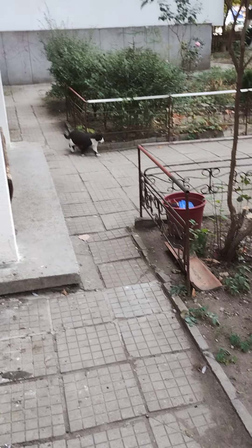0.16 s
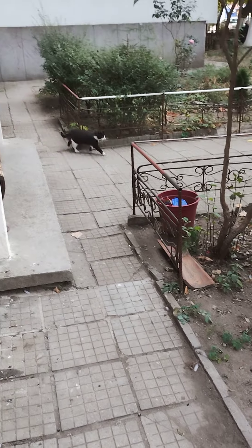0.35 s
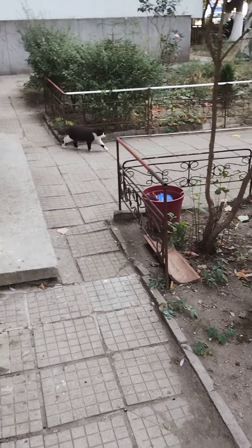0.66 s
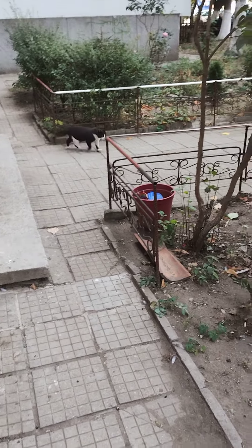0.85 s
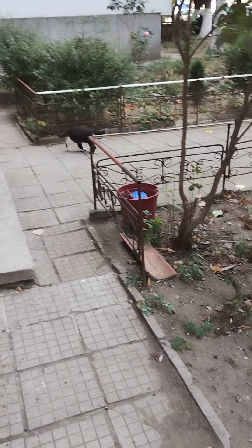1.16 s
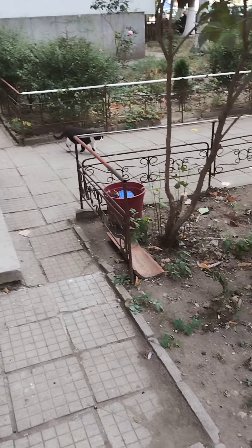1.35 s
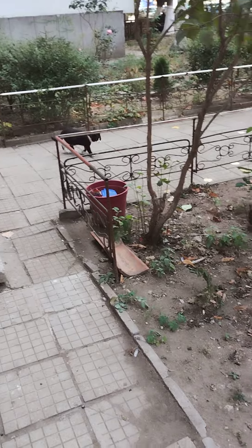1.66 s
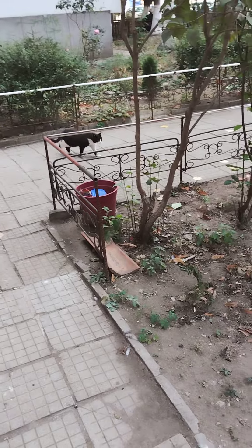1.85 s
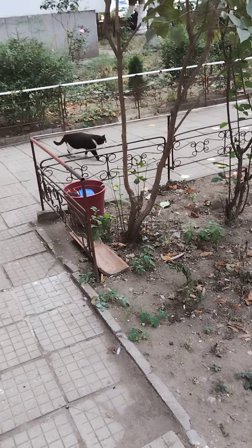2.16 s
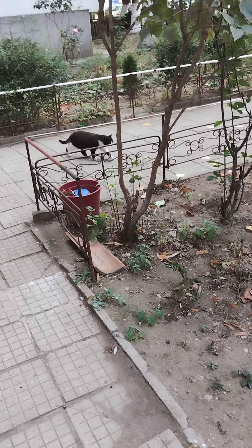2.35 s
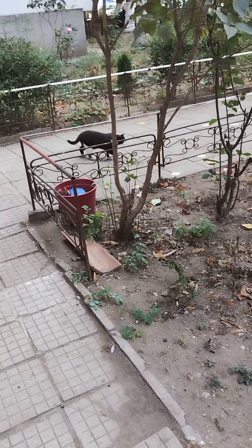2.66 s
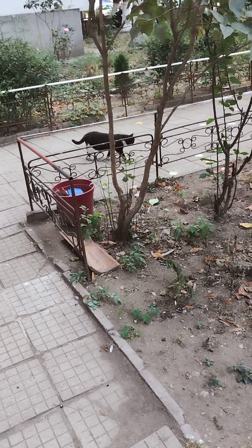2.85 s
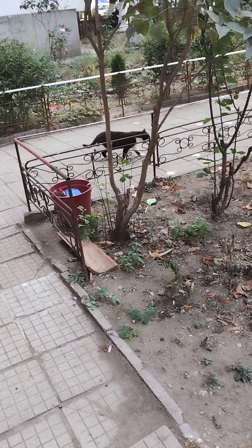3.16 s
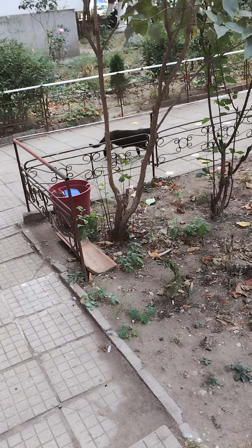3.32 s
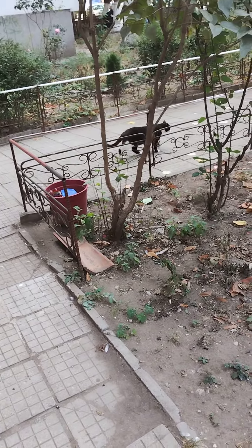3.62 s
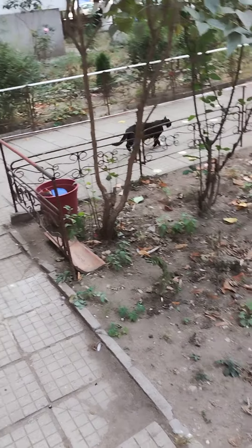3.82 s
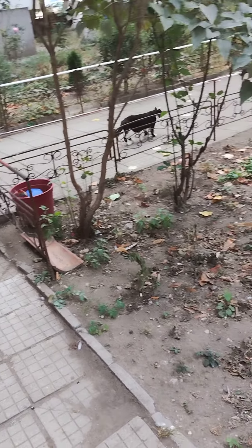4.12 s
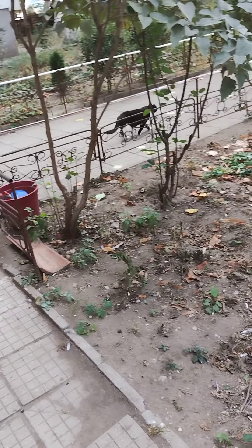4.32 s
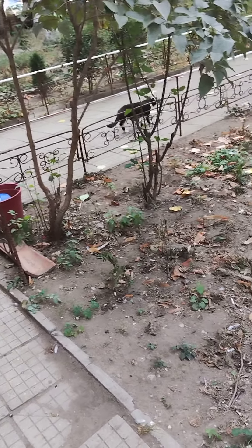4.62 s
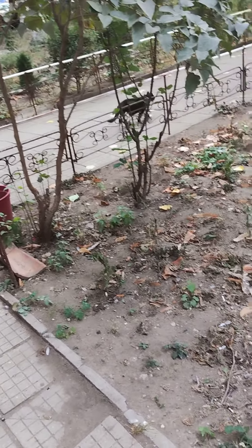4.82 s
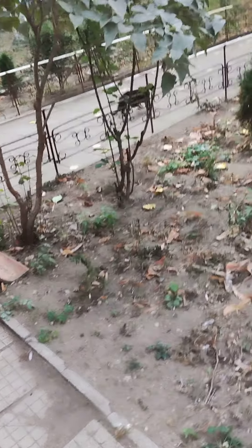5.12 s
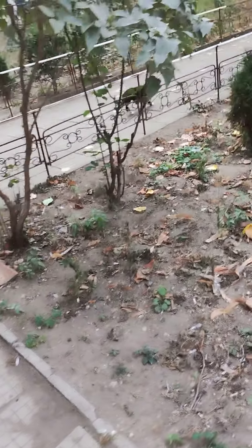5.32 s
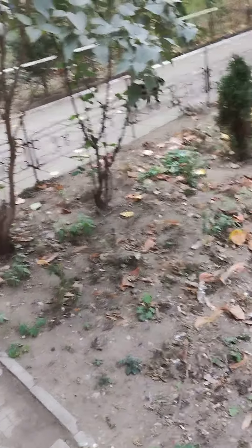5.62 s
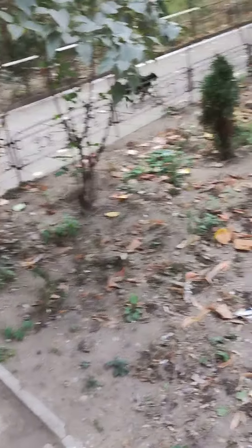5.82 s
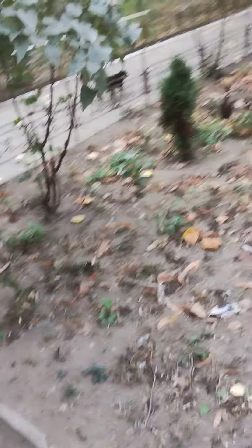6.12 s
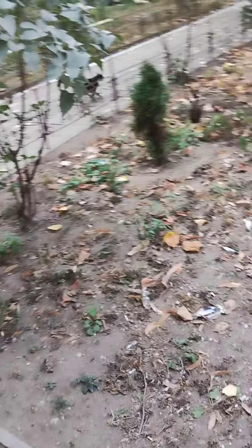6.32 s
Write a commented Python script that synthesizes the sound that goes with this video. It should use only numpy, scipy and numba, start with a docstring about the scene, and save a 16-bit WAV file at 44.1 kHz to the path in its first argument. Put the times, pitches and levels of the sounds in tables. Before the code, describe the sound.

Distant road traffic fills a paved courtyard: a low, bass-heavy engine rumble under a soft mid-range tyre roar. A heavy engine booms in swells, strongest in the middle, while other engines climb faintly. Around two and a half seconds, fingers tick sharply against the hand-held phone. A barely audible bird chirp and whisper of leaves lie underneath. The cat walking by makes no audible sound.

```python
"""Traffic behind the houses

Road traffic reaches a paved courtyard and is heard through a hand-held phone with two ports. Engines rumble and
tyres roar near 1 kHz: shaped noise. A heavy engine booms low and other engines climb as they pull away: near
sines. A faint hiss and rustling leaves are filtered noise, a far bird chirps once as a bent sine, and fingers
tick on the phone's case: cracks of noise with short sagging rings. A finger scuffing the case briefly lifts the
hiss."""
import sys
import numpy as np
from scipy import signal
from scipy.fft import rfft, irfft, next_fast_len
from scipy.io import wavfile
from scipy.ndimage import uniform_filter1d
from numba import njit

SR = 44100
rng = np.random.default_rng(int(sys.argv[2]) if len(sys.argv) > 2 else 0)


def transcribe(u):
    """Save the signal u as a 16-bit wav file named by the first command-line argument.

    u: samples, shape (n,) or (channels, n), limited to [-1, 1]; the rate is SR.
    q: integer samples, one column per channel.
    """
    v = np.clip(np.atleast_2d(u).T, -1, 1)
    q = np.round(v * 32767).astype(np.int16)
    wavfile.write(sys.argv[1], SR, q)


N = 285643
PADDED = next_fast_len(N)  # length of the transforms, in samples

# Colours of the hiss, the engines and the tyres. Each row: pitch in Hz, relative level in dB.
HISS_COLOUR = [(2600, -4.5), (3200, 0), (4000, -2.5), (4600, -6), (5100, -9.5), (6300, -12), (7200, -13.5),
               (9000, -16.5), (11000, -17.5), (14000, -18)]
RUMBLE_COLOUR = [(13, -35), (22, -10), (43, -8.5), (65, -5), (81, -0.5), (108, -6.5), (155, -5.5),
                 (183, -7), (269, -6), (290, -8.5), (320, -14.5), (365, -14.5), (443, -19), (600, -19.5),
                 (780, -28), (1320, -120)]
ROAR_COLOUR = [(260, -35), (450, -4), (660, -3.5), (840, -1.5), (1020, -2), (1260, -3.5), (1870, -6.5),
               (2200, -11), (2750, -14.5), (3050, -22), (3400, -30), (4500, -61)]
# Levels over time of the hiss, the deep rumble, the heavy engines, the light engines and the tyres; # the hiss
# rises briefly near 2.5 s where a finger scuffs the case. Each row: time in seconds, level in dB.
HISS_LEVEL = [(0, -70), (2.1, -70), (2.45, -68), (2.53, -68), (2.62, -69), (2.9, -70), (5, -69), (5.9, -68),
              (6.48, -68.5)]
DEEP_LEVEL = [(0, -46), (.6, -52), (1, -43.5), (2.7, -50.5), (3.8, -41.5), (5.2, -50.5), (5.8, -44),
              (6.48, -45)]
HEAVY_LEVEL = [(0, -39.5), (1.5, -42), (2.1, -42.5), (2.7, -40.5), (3.6, -39.5), (4.2, -39), (4.8, -41.5),
               (5.3, -42), (5.7, -41), (6, -40), (6.48, -42)]
LIGHT_LEVEL = [(0, -47), (1.5, -43), (2.6, -40), (3.1, -40.5), (3.7, -41.5), (4.2, -44.5), (4.55, -41),
               (4.9, -43), (5.4, -43), (5.75, -39.5), (6.1, -44), (6.48, -43.5)]
TYRE_LEVEL = [(0, -44), (.7, -44.5), (1.05, -44.5), (1.4, -45.5), (2, -45.5), (2.4, -45), (3, -46),
              (3.8, -45), (4.5, -45), (5.2, -45.5), (6, -44.5), (6.48, -44.5)]
# Gusts in the leaves. Each row: peak time in seconds, half length in seconds, level in dB,
# centre in Hz, width of each filter pass in Hz.
GUSTS = [(1.79, 0.11, -75, 6000, 2400), (4.85, 0.51, -74.5, 4570, 900), (5.9, .08, -76, 9500, 4000),
         (5.98, 0.26, -71, 5950, 1500), (6.35, .22, -75, 6100, 1600)]
# Path of the bird's one chirp. Each row: time in seconds, pitch in Hz, level in dB.
CHIRP = [(3.558, 6950, -86), (3.57, 7700, -83), (3.582, 7620, -80), (3.591, 7320, -73), (3.604, 7150, -88)]
# Finger ticks on the case. Each row: start in seconds, ring peak in dB, starting pitch of the ring in Hz,
# rise to the peak in cycles of that pitch (under 1 is a dry snap), crack level in dB,
# left minus right in dB.
TICKS = [(1.5086, -43.5, 6000, .3, -65, -16), (2.3147, -43, 11000, 7, -46, -2),
         (2.3164, -32.5, 10750, 6.6, -33, -2), (2.5075, -50, 7900, 7, -49, -4),
         (2.5197, -68, 14000, 6, -60, -3), (2.5262, -47, 3700, 5, -54, -2), (2.5305, -50, 3200, 4, -58, -2),
         (2.5362, -56, 10500, 1.5, -50, -3), (2.539, -36, 1500, 1.6, -60, -4),
         (2.5408, -39, 2860, 5.1, -50, -5), (2.5437, -41, 3840, 4.3, -50, -3),
         (2.545, -48, 5400, 3.5, -56, -4), (2.5472, -50, 3570, 3, -56, -5),
         (2.5462, -58, 11800, 10, -54, 0), (2.5412, -60, 11000, 10, -52, -2),
         (2.533, -60, 8500, 2, -56, -3), (3.1963, -58, 9000, .4, -52, 6), (5.9618, -53, 7500, .4, -60, 3.5)]
# Engine notes that climb steadily. Each row: start in seconds, end in seconds, first pitch in Hz,
# last pitch in Hz, level in dB.
CLIMBS = [(1.053, 2.243, 91.86, 146.9, -47), (4.409, 5.38, 143, 167, -47)]
# The heavy engine's boom, one row for each stretch at nearly one pitch; neighbouring stretches may
# overlap. Each row: first pitch in Hz, last pitch in Hz, then a list of pairs of time in seconds
# and level in dB.
BOOMS = [ (80.7, 86, [(0, -28), (.09, -53), (.12, -33), (.2, -45), (.23, -34), (.36, -65)]),
         (74.5, 74.7, [(2.08, -42), (2.14, -35), (2.19, -39.5), (2.39, -30.5), (2.49, -37), (2.55, -24),
         (2.61, -30), (2.65, -40)]), (76.3, 76.6, [(2.63, -44), (2.71, -29.5), (2.82, -42), (2.93, -34),
         (3.02, -31.5), (3.05, -45), (3.1, -32), (3.13, -39), (3.17, -33.5), (3.4, -26), (3.54, -47),
         (3.62, -46)]), (75.4, 74.7, [(3.6, -51), (3.69, -29.5), (3.72, -40), (3.76, -30.5), (3.9, -30),
         (4.02, -37), (4.13, -47)]), (78.34, 76.5, [(4.7, -43.5), (4.92, -38.5), (5.12, -38.5), (5.33, -44),
         (5.45, -40), (5.68, -37), (5.8, -52)]), ]
# Upper drone of the light engines. Each row: time in seconds, centre in Hz, lift as a gain.
DRONE = [(0, 375, 0.47), (1, 380, 0.41), (1.8, 330, .1), (2.3, 323, .05), (2.7, 330, 0.54),
         (3.3, 335, 0.45), (3.55, 345, 0.27), (3.85, 344, 1.3), (4.1, 344, 0.82), (4.4, 346, 0.17),
         (5.4, 385, 0.1), (5.9, 404, .8), (6.48, 410, 0.54)]
# Hump of the tyre roar, and a higher, narrower whine that sinks as a car passes.
# Each row: time in seconds, centre in Hz, lift as a gain, width of each filter pass in Hz.
TYRE_HUMP = [(0, 910, 0.5, 450), (.5, 920, 0.24, 500), (.95, 840, 0.45, 450), (1.2, 960, 0.23, 500),
             (1.5, 890, 0.66, 400), (1.9, 840, 0.26, 400), (2.4, 970, 0.22, 500), (3.2, 900, 0.2, 450),
             (5.2, 970, 0.1, 350), (5.6, 1000, 0.5, 240), (5.9, 1040, 0.91, 189), (6.1, 1040, 0.56, 200),
             (6.3, 1015, 1.1, 220), (6.48, 990, 0.7, 260)]
TYRE_WHINE = [(5.1, 1520, 0.01, 180), (5.3, 1510, 0.52, 180), (5.9, 1440, 0.76, 180),
              (6.2, 1380, 0.24, 180), (6.4, 1300, 0.01, 180)]
# How the two ports differ. Each row: pitch in Hz, likeness from 0 to 1, lead of the left in radians,
# left minus right in dB.
PORTS = [(30, .98, .33, -3.8), (90, .99, .35, -2.5), (220, .99, .22, -.5), (380, .96, .15, -2),
         (600, .65, .15, -4), (800, .4, .5, -2), (1100, .28, 1.3, -2.2), (1600, .18, 1.8, -2.3),
         (2200, .3, 2.2, -2.3), (2900, .08, 3.3, -.5), (4200, .05, 3.3, -.5), (6000, .05, 3.3, 1.2),
         (14000, .05, 3.3, .5)]


def undb(db):
    """Turns a level in dB into a gain."""
    return 10 ** (np.asarray(db) / 20)


def curves(table):
    """Draws straight lines between the rows of a time table, one value per sample for each column."""
    seconds, *columns = np.transpose(table)
    return [np.interp(np.arange(N) / SR, seconds, column) for column in columns]


def bin_hz():
    """Pitch of each bin of a transform in Hz, kept at 1 or more."""
    return np.maximum(np.arange(PADDED // 2 + 1) * SR / PADDED, 1)


def over_hz(table, column=1):
    """Spreads a column of a pitch table over the transform's bins, evenly in octaves."""
    table = np.array(table)
    return np.interp(np.log(bin_hz()), np.log(table[:, 0]), table[:, column])


def walk(rate):
    """Wanders at random: draws held for 1 / rate seconds, then smoothed twice; spread near 1."""
    hold = int(SR / rate)
    steps = np.repeat(rng.standard_normal(N // hold + 1), hold)
    smooth = uniform_filter1d(uniform_filter1d(steps, hold), hold)
    return 1.21 * smooth[:N]


@njit
def band_pass(x, hz, width):
    """Lets through a band around a moving centre, with gain 1 there (a state-variable filter)."""
    y, band, low = np.empty(len(x)), 0., 0.
    for i in range(len(x)):
        g, damping = np.tan(np.pi * hz[i] / SR), width[i] / hz[i]
        v = (band + g * (x[i] - low)) / (1 + g * (g + damping))
        band = 2 * v - band
        low = low + 2 * g * v
        y[i] = damping * v
    return y


def band_pass_twice(pair, hz, width):
    """Runs both sides through the same band twice, for steeper slopes."""
    return np.array([band_pass(band_pass(side, hz, width), hz, width) for side in pair])


def ports(shared, own=None):
    """Left and right spectra of one wave field; what is not alike comes from other directions."""
    like = np.clip(over_hz(PORTS, column=1), 0, 1) if own is not None else 1
    right = rfft(shared, PADDED)
    left = like * right * np.exp(1j * over_hz(PORTS, column=2))
    if own is not None:
        left = left + np.sqrt(1 - like ** 2) * rfft(own, PADDED)
    tilt = undb(over_hz(PORTS, column=3) / 2)
    return np.array([left * tilt, right / tilt])


def field(colour, lo_hz, hi_hz, flicker_db, rate):
    """Coloured noise from all around, in third-octave bands that flicker alone; the mid has rms 1."""
    hz = bin_hz()
    soft_edges = 1 / np.sqrt((1 + (lo_hz / hz) ** 8) * (1 + (hz / hi_hz) ** 8))
    pair = ports(*rng.standard_normal((2, PADDED))) * undb(over_hz(colour)) * soft_edges
    out = 0
    for centre in lo_hz * 2 ** np.arange(-1, np.log2(hi_hz / lo_hz) + 1.5, 1 / 3):
        # neighbouring bands cross over and add up to 1
        share = np.cos(np.pi * np.clip(1.5 * np.log2(hz / centre), -.5, .5)) ** 2
        out = out + irfft(pair * share, PADDED)[:, :N] * undb(flicker_db * walk(rate))
    mid = out.mean(axis=0)
    return out / np.sqrt(np.mean(mid ** 2))


def hiss():
    """A faint, wide noise from all around; it swells briefly near 2.5 s as a finger scuffs the case."""
    return field(HISS_COLOUR, 3270, 15000, flicker_db=1.0, rate=22.04) * undb(*curves(HISS_LEVEL))


def leaves():
    """Leaves rustle in a narrower band with each gust, which swells and fades as a bell curve."""
    t, out = np.arange(N) / SR, 0
    noise = rng.standard_normal((2, N))
    for peak_s, half_s, db, hz, width_hz in GUSTS:
        rustle = band_pass_twice(noise, np.full(N, 1. * hz), np.full(N, 1. * width_hz))
        gust = np.exp(-((t - peak_s) / half_s) ** 2)
        out = out + rustle / rustle.std() * undb(db) * gust
    return out * undb(2.1 * walk(18))


def sine(hz):
    """A sine of rms 1 that follows a moving pitch, from a random point of its cycle."""
    turns = np.cumsum(hz) / SR + rng.random()
    return np.sqrt(2) * np.sin(2 * np.pi * turns)


def sounding(start_s, end_s, fade_s):
    """1 inside a span and 0 outside, with straight fades at both ends."""
    t = np.arange(N) / SR
    return np.clip(np.minimum(t - start_s, end_s - t) / fade_s, 0, 1)


def bird():
    """A chirp as a near sine that rises and falls once, a little wavery in pitch and level."""
    hz, db = curves(CHIRP)
    tone = sine(hz * (1 + .007 * walk(300)))
    return tone * undb(db + 2.5 * walk(199.5)) * sounding(CHIRP[0][0], CHIRP[-1][0], fade_s=.004)


def ticks(lead_s, sag, crack_s):
    """A wide crack as the skin lets go, and a short ring of the case that sags in pitch."""
    out, t = np.zeros((2, N)), np.arange(int(.03 * SR)) / SR
    high_pass = signal.butter(2, 6200, "high", fs=SR, output="sos")
    grit = signal.sosfilt(high_pass, rng.standard_normal((len(TICKS), 2, len(t)))) / 2
    for (start_s, db, hz, cycles, crack_db, pan_db), noise in zip(TICKS, grit):
        first = int(start_s * SR)
        for side, sign in enumerate((1, -1)):
            # the left port is nearer, so the right starts later; the ring's swell peaks at age 1
            age = np.maximum(t - side * lead_s, 0) * hz / cycles
            turns = cycles * (age * (1 - sag) + sag * (1 - np.exp(-age)))
            swell = (age * np.exp(1 - age)) ** 2
            ring = np.sin(2 * np.pi * turns) * swell * undb(db)
            crack = noise[side] * np.exp(-t / crack_s) * np.minimum(age, 1) * undb(crack_db)
            out[side, first:first + len(t)] += (ring + crack) * undb(sign * pan_db / 2)
    return out


def engine_note(first_hz, last_hz, levels, waver, flutter_db=0):
    """One engine order: nearly a sine, gliding evenly and silent outside its span."""
    start_s, end_s = levels[0][0], levels[-1][0]
    hz = np.interp(np.arange(N) / SR, (start_s, end_s), (first_hz, last_hz))
    db = curves(levels)[0] + flutter_db * walk(6.5)
    return sine(hz * (1 + waver * walk(12))) * undb(db) * sounding(start_s, end_s, fade_s=0.027)


def single_engines():
    """The heavy engine's boom and the climbing engines, each one wave that meets both ports."""
    boom = sum(engine_note(*stretch, waver=0.0036) for stretch in BOOMS)
    climb = 0
    for start_s, end_s, first_hz, last_hz, db in CLIMBS:
        levels = [(start_s, db), (end_s, db)]
        climb = climb + engine_note(first_hz, last_hz, levels, waver=0.03, flutter_db=2)
    return irfft(ports(boom + climb), PADDED)[:, :N]


def tyres():
    """Tread on asphalt rings a broad hump that slides with the speed of the cars."""
    roar = field(ROAR_COLOUR, 446, 4000, flicker_db=1.2, rate=14)
    # the whine is a band of the roar lifted after the hump has been added
    for table in (TYRE_HUMP, TYRE_WHINE):
        hz, lift, width_hz = curves(table)
        hz = hz * (1 + 0.0088 * walk(4.6))
        roar = roar + lift * undb(1.5 * walk(9)) * band_pass_twice(roar, hz, width_hz)
    return roar * undb(*curves(TYRE_LEVEL))


def engines():
    """Many far engines blend into noise: a deep rumble, heavy engines, and light ones with a drone."""
    deep = field(RUMBLE_COLOUR, 30, 60.4, flicker_db=0.87, rate=9.4)
    heavy = field(RUMBLE_COLOUR, 61.0, 168, flicker_db=2.7, rate=5.06)
    light = field(RUMBLE_COLOUR, 183.3, 486, flicker_db=2.54, rate=6)
    drone_hz, lift = curves(DRONE)
    width_hz = np.full(N, 66.0)
    light = light + lift * np.array([band_pass(side, drone_hz, width_hz) for side in light])
    rumble = deep * undb(*curves(DEEP_LEVEL)) + heavy * undb(*curves(HEAVY_LEVEL))
    return rumble + light * undb(*curves(LIGHT_LEVEL))


def scene():
    """Adds up all sources at the two ports."""
    background = hiss() + leaves() + bird()
    fingers = ticks(lead_s=0.00009, sag=0.33, crack_s=0.0018)
    return background + fingers + single_engines() + tyres() + engines()


def record(dry):
    """The small capsules lose the deepest bass; the phone cuts the top steeply."""
    bass_cut = signal.butter(4, 34, "high", fs=SR, output="sos")
    top_cut = signal.ellip(12, .2, 70, 14120, fs=SR, output="sos")  # ripple and depth in dB, edge in Hz
    return signal.sosfilt(top_cut, signal.sosfilt(bass_cut, dry))


dry = scene()
out = record(dry)
transcribe(out)
```